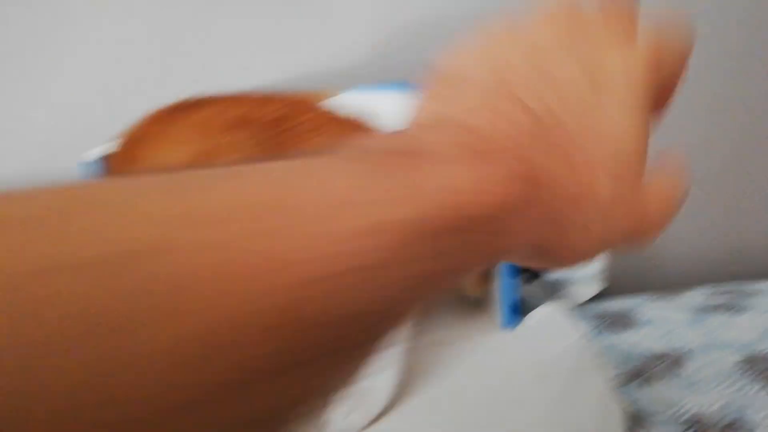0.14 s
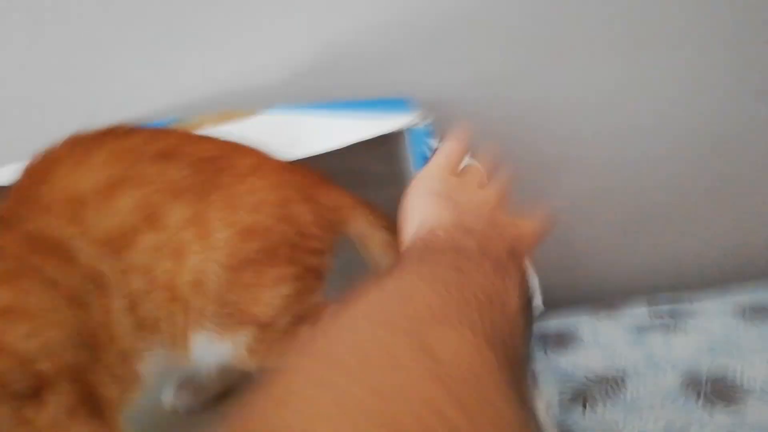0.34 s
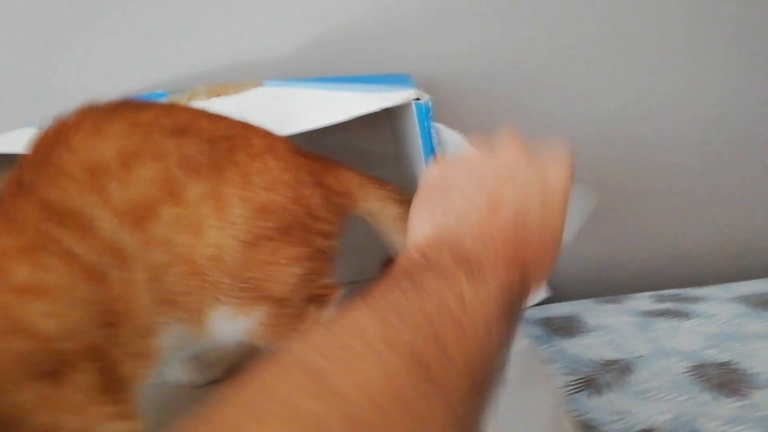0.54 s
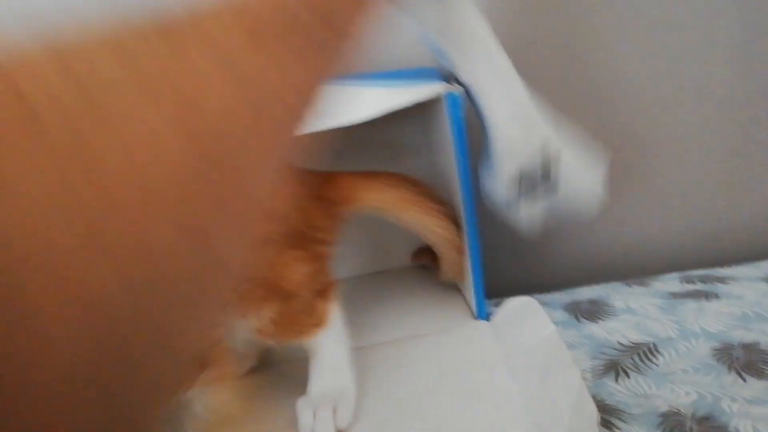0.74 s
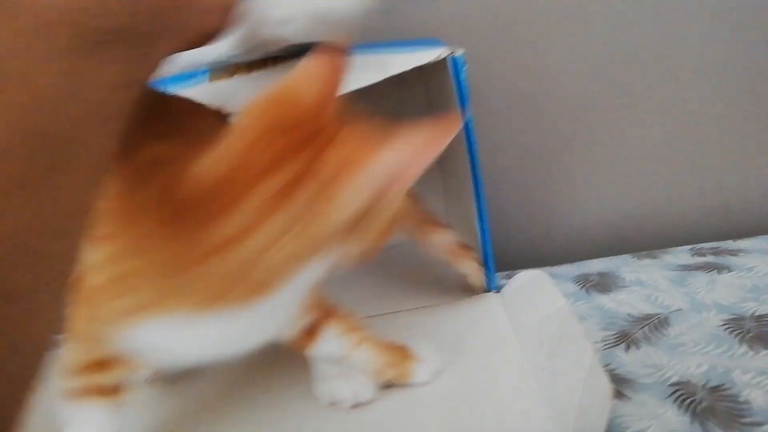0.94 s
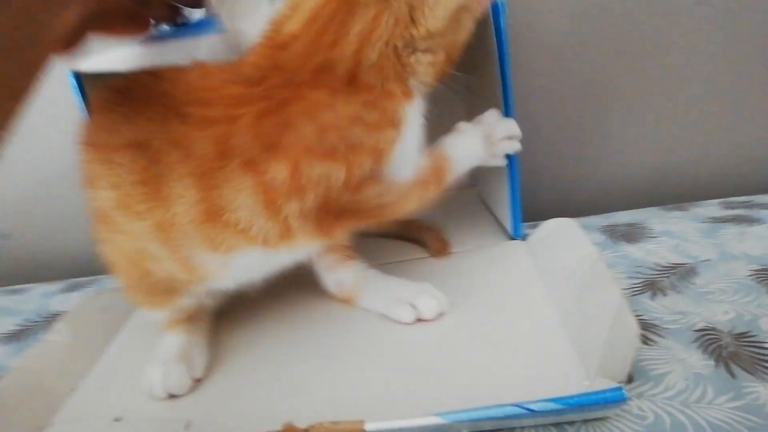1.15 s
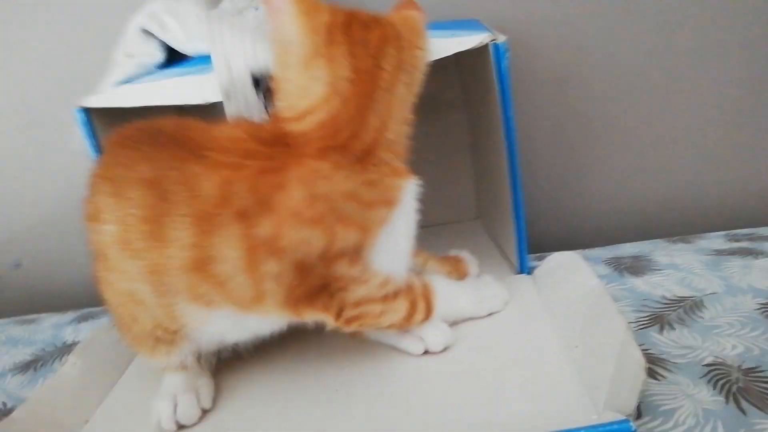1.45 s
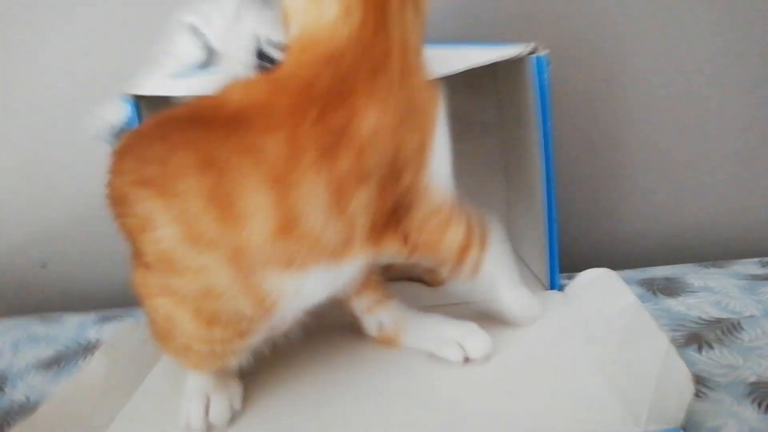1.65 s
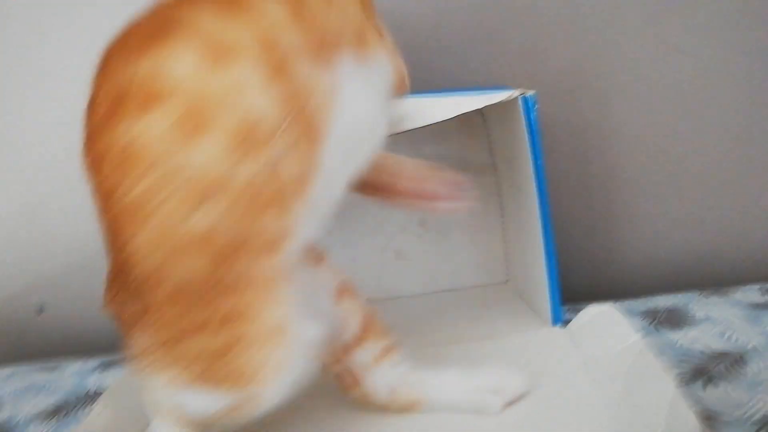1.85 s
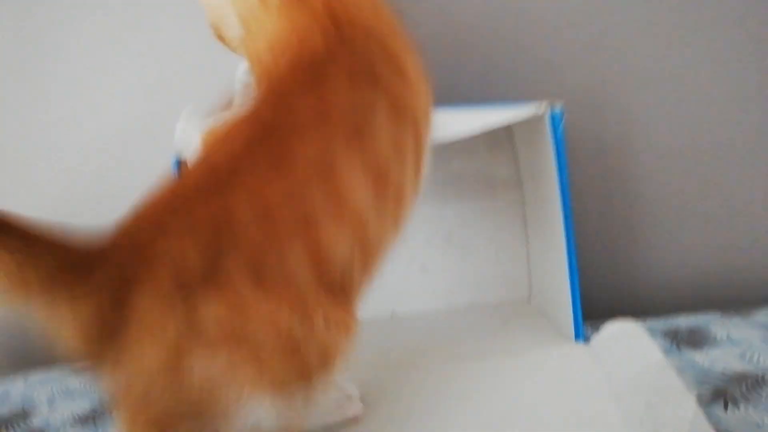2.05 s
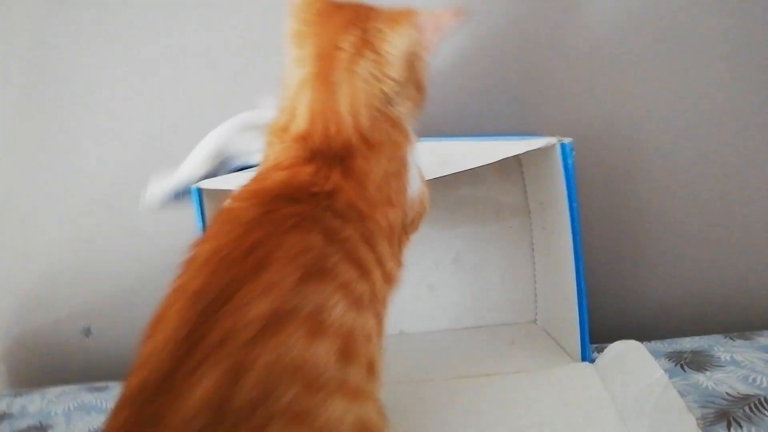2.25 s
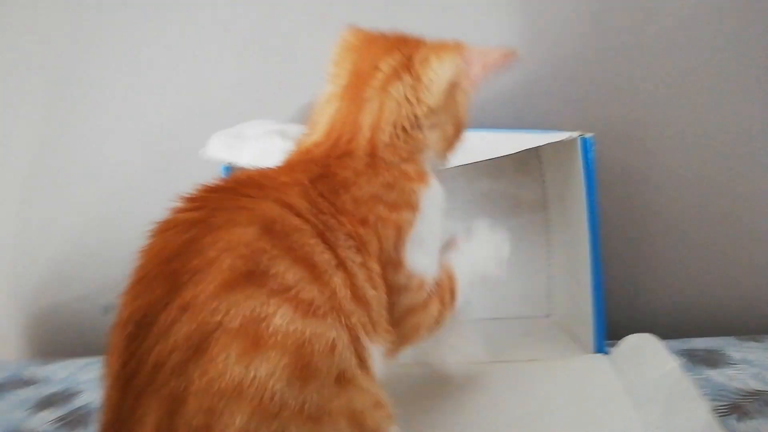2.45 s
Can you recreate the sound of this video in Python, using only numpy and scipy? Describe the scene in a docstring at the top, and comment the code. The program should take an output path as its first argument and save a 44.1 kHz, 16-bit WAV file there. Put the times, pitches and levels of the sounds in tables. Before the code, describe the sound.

Cardboard box knocks, paw thuds and scratchy scuffs as a kitten moves about on a bed

```python
"""On a bed, a kitten scrambles in a cardboard box, close to a hand-held phone with two microphone ports.
Paws thud on the box floor (swinging tones), knock its walls (struck resonances) and drag over the card
(noise that flares at random slips); long slides make a wall sing and claws tick (bright noise bursts).
Fur and cloth rustle and the mattress rumbles under the moving weight, both as grainy noise,
over a faint room hiss. Knocks and ticks leave a short dull room tail."""
import sys
import numpy as np
from scipy import signal
from scipy.fft import rfft, irfft
from scipy.io import wavfile
from scipy.ndimage import uniform_filter1d

SR = 44100
rng = np.random.default_rng(int(sys.argv[2]) if len(sys.argv) > 2 else 0)


def master_out(mix):
    """Clip the mix to full scale and print it as 16-bit PCM to the path in sys.argv[1]."""
    frames = np.transpose(np.atleast_2d(mix))
    ceiling = np.clip(frames, -1, 1)
    pcm = np.round(ceiling * 32767).astype(np.int16)
    wavfile.write(sys.argv[1], SR, pcm)


def to_linear_factor(level_db):
    """Convert decibel levels (scalar or array-like) to linear amplitude factors."""
    exponent = np.asarray(level_db, float) / 20
    return 10 ** exponent


N = 114660  # length in samples, 2.6 s

# Tone colour of paw rubbing on card. Each row: frequency in Hz, relative level in dB.
CARD_COLOUR = [(200, -35), (380, -17), (600, -10), (860, -5), (1400, -2.5), (2600, -9.5), (4200, -7.5),
               (5800, -17), (10400, -16), (16000, -60)]


def evened(x):
    """Scales a sound to an rms of 1."""
    return x / np.sqrt(np.mean(x ** 2) + 1e-20)


def peaked(x):
    """Scales a sound to a peak of 1."""
    return x / np.abs(x).max()


def read(points, hz):
    """Reads a table of (Hz, value) points at any frequency, along a log frequency axis."""
    f, value = np.transpose(points)
    return np.interp(np.log(hz + 1), np.log(f + 1), value)


def curve(table):
    """Draws straight lines between the rows of a timed table, giving each column at every sample."""
    rows = np.transpose(table)
    t = np.arange(N) / SR
    return [np.interp(t, rows[0], column) for column in rows[1:]]


def sides(pan_db):
    """Left and right gains that differ by pan_db; positive is louder on the left."""
    return np.array([to_linear_factor(pan_db / 2), to_linear_factor(-pan_db / 2)])


def place(rows, source):
    """Makes one sound per row with the given source and mixes it in at its start time."""
    mix = np.zeros((2, N))
    for start_s, *settings in rows:
        sound = source(*settings)
        part = mix[:, round(start_s * SR):][:, :sound.shape[-1]]
        part += sound[..., :part.shape[1]]
    return mix


def resonate(x, hz, width_hz):
    """A resonance: shifts hz down to zero, smooths, then shifts back; hz may glide."""
    turn = np.exp(2j * np.pi * np.cumsum(hz * np.ones(x.shape[-1])) / SR)
    r = np.exp(-np.pi * width_hz / SR)
    smooth = signal.lfilter([1 - r], [1, -r], x / turn)
    return 2 * (turn * smooth).real


def resonate_twice(x, hz, width_hz):
    """The same resonance two times over, for steeper slopes."""
    return resonate(resonate(x, hz, width_hz), hz, width_hz)


def alike(pair, same):
    """Blends two independent noises so that the ports are alike by the share same (0 to 1)."""
    return np.array([pair[0], same * pair[0] + np.sqrt(1 - same ** 2) * pair[1]])


def friction(colour, per_s, size_db, grain_s):
    """Rubbing: noise that flares at random slips and dies away, coloured, partly alike at the two ports."""
    # How alike the two ports are. Each row: frequency in Hz, likeness from 0 to 1.
    likeness = [(30, .998), (100, 0.99), (200, 0.88), (380, 0.53), (800, 0.2), (1500, 0.23), (4000, 0),
                (12000, 0)]
    sizes = to_linear_factor(size_db * np.minimum(rng.exponential(1, N), 3.5))
    slips = sizes * (rng.random(N) < per_s / SR)
    flare = signal.lfilter([1], [1, -np.exp(-1 / (grain_s * SR))], slips) + 0.1
    spectrum = rfft(flare * rng.standard_normal((2, N)))
    hz = np.fft.rfftfreq(N, 1 / SR)
    coloured = alike(spectrum, read(likeness, hz)) * to_linear_factor(read(colour, hz))
    return evened(irfft(coloured, N))


def burst(t60, same, rise_s, size=4000):
    """A noise burst for two ports that swells, then dies by 60 dB in t60 seconds."""
    t = np.arange(size) / SR
    envelope = to_linear_factor(-60 * t / t60) * (1 - np.exp(-t / rise_s))
    return alike(rng.standard_normal((2, size)) * envelope, same)


def drag():
    """Paws drag over the card in dense, uneven slips."""
    # How strongly the paws rub. Each row: time in seconds, level in dB.
    rubbing = [(0, -62), (0.12, -64), (0.415, -48), (0.425, -35.5), (0.5, -46.5), (0.58, -54.5),
               (0.66, -46.5), (0.8, -46.5), (0.9, -50), (0.96, -53), (0.98, -44.5), (1.09, -42),
               (1.12, -46.5), (1.16, -68), (1.19, -45), (1.235, -40), (1.26, -36.5), (1.29, -39.5),
               (1.335, -41.5), (1.365, -37), (1.41, -52.5), (1.5, -51.5), (1.66, -53), (1.72, -49),
               (1.87, -40.5), (1.98, -61), (2.06, -55), (2.09, -47.5), (2.35, -48), (2.48, -55),
               (2.54, -46.5)]
    return to_linear_factor(curve(rubbing)[0]) * friction(CARD_COLOUR, per_s=660, size_db=7, grain_s=0.024)


def fur():
    """Fur and cloth rustle in fine bright grains that lean left or right."""
    # How the rustle moves. Each row: time in seconds, level in dB, left minus right in dB.
    rustle = [(0, -57, 6.5), (0.1, -61, 3.5), (0.2, -53, 7), (0.412, -48, 1.5), (0.43, -39.5, 7),
              (0.47, -47.5, 4), (0.62, -58, 2), (0.7, -45, -7), (0.8, -49.5, 4), (0.87, -51.5, 1.5),
              (0.965, -42, 3), (0.975, -33.5, 2), (1.07, -37, 4), (1.11, -47.5, 2), (1.19, -55, 9),
              (1.28, -46.5, 8), (1.32, -45.5, -1), (1.39, -53.5, 5), (1.5, -57.5, 6), (1.66, -53.5, 3),
              (1.8, -46.5, -0.5), (1.95, -39, 1.5), (2.0, -43.5, -2), (2.06, -52, 0), (2.1, -42, -1),
              (2.33, -44.5, -4.5), (2.45, -50.5, -3.5), (2.6, -54.5, 7)]
    # Tone colour of the rustle. Each row: frequency in Hz, relative level in dB.
    colour = [(520, -7), (1200, -3.5), (2500, -8.5), (3690, -8.5), (4580, -5.5), (7650, -6.5), (9080, -2),
              (11600, 1), (14900, -11.5), (16000, -16.5)]
    db, pan_db = curve(rustle)
    return to_linear_factor(db) * sides(pan_db) * friction(colour, per_s=900, size_db=2.5, grain_s=0.0087)


def bed():
    """The mattress gives a lumpy low rumble under the moving weight."""
    # How strongly the mattress rumbles. Each row: time in seconds, level in dB.
    rumble = [(0, -43.5), (0.1, -53.5), (0.3, -52.5), (0.45, -43), (0.55, -46), (0.7, -41.5), (0.88, -48),
              (1.13, -45.5), (1.3, -47), (1.4, -53.5), (1.58, -40.5), (1.65, -33), (1.75, -39.5),
              (1.9, -42), (2.04, -44.5), (2.15, -39), (2.25, -47.5), (2.45, -52.5), (2.6, -44)]
    # Tone colour of the rumble. Each row: frequency in Hz, relative level in dB.
    colour = [(15, -1.5), (30, -6.5), (42, -0.5), (56, -1), (80, -4), (120, -13.5), (175, -12.5),
              (260, -16.5), (400, -21), (520, -27), (1000, -82)]
    return to_linear_factor(curve(rumble)[0]) * friction(colour, per_s=300, size_db=1.5, grain_s=0.015)


def hiss():
    """A faint room hiss: noise with flares so frequent that they blur together."""
    # Tone colour of the hiss. Each row: frequency in Hz, relative level in dB.
    colour = [(100, -21), (289, -24), (6150, -45), (11900, -51), (16000, -49)]
    return to_linear_factor(-68.5) * friction(colour, per_s=5700, size_db=0, grain_s=0.0034)


def thud(db, hz, t60):
    """The box floor bends and swings back unevenly: a wobbling tone and a faster-dying overtone."""
    size = 9000
    t = np.arange(size) / SR
    smoothed = uniform_filter1d(rng.standard_normal(size), size=300)
    shake = evened(uniform_filter1d(smoothed, size=300))
    # The wobble, in radians, grows in over the first two cycles.
    angle = 2 * np.pi * hz * t + shake * np.minimum(hz * t / 2, 1)
    fade = to_linear_factor(-60 * t / t60)
    swing = np.sin(angle) + to_linear_factor(-6) * fade * np.sin(2.015 * angle)
    rise = 1 - np.exp(-t / 0.0011)
    return -to_linear_factor(db - 2.5) * peaked(rise * fade * swing)  # the first swing is downward


def thuds():
    """All paw thuds on the box floor, equal at both ports."""
    # Each row: start in seconds, level in dB before a shared trim, pitch in Hz,
    # time to die by 60 dB in seconds.
    paw_thuds = [(0.183, -36, 65.4, 0.39), (0.426, -30.5, 97.7, 0.26), (0.428, -37, 340, 0.18),
                 (0.511, -32.5, 62, 0.059), (0.593, -24.5, 93, 0.01), (0.618, -33.5, 63, 0.09),
                 (0.938, -36, 167, 0.12), (1.043, -36, 182, 0.098), (1.067, -30, 85.5, 0.14),
                 (1.179, -32, 72, 0.19), (1.292, -21.5, 405, 0.061), (1.297, -29.5, 103.7, 0.3),
                 (1.302, -23, 253, 0.11), (1.322, -18.5, 133, 0.038), (1.543, -29, 154, 0.19),
                 (1.615, -25, 110, 0.071), (1.628, -24, 133, 0.07), (1.64, -33, 243, 0.085),
                 (1.684, -38, 67.3, 0.061), (1.776, -32, 102, 0.12), (1.851, -27, 108.2, 0.27),
                 (1.874, -28.5, 65.6, 0.041), (1.942, -28, 64.4, 0.19), (2.072, -18, 167.4, 0.12),
                 (2.12, -39, 133, 0.1), (2.165, -30.5, 65.2, 0.15)]
    return place(paw_thuds, thud)


def knock(db, hz, snap_db, contact_s):
    """A first snap and a rough contact ring the struck spot and the wall modes nearest it, with a dry crack."""
    # Resonances of the box wall, before each knock detunes them slightly. Each row: frequency in Hz,
    # level in dB before the loss with distance in pitch, time to die by 60 dB in seconds.
    wall_modes = [(630, -2, 0.039), (790, -9, 0.058), (900, -8, 0.083), (1112, -10, 0.094),
                  (1180, -10, 0.039), (1320, -1.5, 0.047), (1480, -8, 0.054), (1740, -11, 0.023),
                  (1860, -8, 0.042), (2140, -9, 0.016), (2800, -6, 0.025), (3270, 1, 0.017),
                  (3770, 9, 0.0067)]
    t = np.arange(4000) / SR
    likeness = 0.45
    spot_turns, snap_turns = 21, 0.21  # the spot's 60 dB decay and the snap's width, in cycles of hz
    ring = to_linear_factor(6.5 - 60 * t * hz / spot_turns) * np.sin(2 * np.pi * hz * t)
    for mode_hz, mode_db, t60 in wall_modes:
        bend = 1 + 0.012 * rng.standard_normal()
        near_db = mode_db - 26 * abs(np.log2(mode_hz / hz))  # 26 dB lost per octave away
        ring = ring + to_linear_factor(near_db - 60 * t / t60) * np.sin(2 * np.pi * mode_hz * bend * t)

    contact = burst(5 * contact_s, likeness, contact_s)
    body = signal.fftconvolve(contact, ring[None], axes=1)[:, :4000]

    dry_noise = burst(0.013 + 2 * contact_s, likeness, contact_s / 2)
    crack = resonate(resonate(dry_noise, hz, 0.94 * hz), 1.4 * hz, 0.89 * hz)

    u = t * hz / snap_turns
    snap = peaked(u * (1 - u / 2) * np.exp(-u)) + peaked(ring)
    struck = peaked(body) + to_linear_factor(-3 + snap_db / 2) * peaked(crack) - to_linear_factor(snap_db) * snap
    return to_linear_factor(db - 2) * struck


def knocks():
    """All knocks on the box walls."""
    # Each row: start in seconds, level in dB before a shared trim, pitch of the struck spot in Hz,
    # first snap in dB, contact time in seconds.
    wall_knocks = [(.327, -33.5, 3230, -1, 0.0016), (.422, -31, 1000, -8, 0.0075),
                   (.593, -36, 990, 3, 0.00025), (.618, -31, 1244, 0, 0.0015),
                   (.971, -27.5, 1560, -27, 0.003), (1.045, -46, 795, -9, 0.002),
                   (1.069, -27, 1410, -23, 0.0015), (1.097, -35, 1360, -12, 0.0013),
                   (1.165, -15.5, 2160, -20, 0.0014), (1.166, -27.5, 1130, -20, 0.0045),
                   (1.171, -15, 1610, -12, 0.0048), (1.175, -13.5, 1210, -35, 0.0014),
                   (1.176, -16, 2120, -9, 0.0013), (1.186, -23, 1220, -26, 0.0024),
                   (1.197, -34, 1460, -22, .004), (1.293, -15, 1630, -1, 0.001),
                   (1.294, -17.5, 4050, 0, 0.0045), (1.302, -26, 1820, 4.5, 0.005),
                   (1.311, -19.5, 3750, -24, 0.0013), (1.544, -34, 900, -10, 0.0012),
                   (1.615, -37, 720, -18, 0.0041), (1.686, -29.5, 1320, -17, 0.0059),
                   (1.7, -19.5, 1236, -24, 0.0026), (1.711, -28.5, 1260, -5, 0.0011),
                   (1.702, -29.5, 624, -21, 0.0076), (1.774, -26, 1220, -6, 0.005),
                   (1.852, -22.5, 1130, -31, 0.0015), (1.861, -24.5, 970, -16, 0.0035),
                   (2.07, -27, 1390, -4.5, 0.0023), (2.16, -24.5, 1320, -15, 0.0021)]
    return place(wall_knocks, knock)


def slides():
    """Long slides make a wall sing: uneven slips ring two gliding wall resonances."""
    # One table per slide. Each row: time in seconds, level of the lower resonance in dB, its pitch in Hz.
    slide_tables = [
        [(.62, -44, 1230), (.7, -47, 1360), (.84, -47.5, 1430), (.9, -55, 1460)],
        [(2.1, -51, 1320), (2.2, -55, 1310), (2.33, -48.5, 1230), (2.42, -61, 1190)],
    ]
    ring_hz, edge_s = 185, 0.015  # width of the lower resonance, fade at each end
    t, out = np.arange(N) / SR, 0
    for table in slide_tables:
        db, hz = curve(table)
        rub = friction(CARD_COLOUR, per_s=1500, size_db=1.5, grain_s=0.0084)
        from_ends = np.minimum(t - table[0][0], table[-1][0] - t)
        inside = np.clip(from_ends / edge_s, 0, 1)
        lower = evened(resonate_twice(rub, hz, ring_hz))
        upper = evened(resonate_twice(rub, 1.56 * hz, 1.56 * ring_hz))
        out = out + inside * to_linear_factor(db) * (lower + to_linear_factor(-10) * upper)
    return out * sides(-1.6)[:, None]


def tick(db, hz, t60, wide_db):
    """A claw catches and lets go: a bright burst, heard through a narrow and a broad resonance."""
    snap = burst(t60, same=0.25, rise_s=0.001)
    narrow = resonate_twice(snap, hz, hz / 6)
    wide = resonate(resonate(snap, 7900, 7900), 8400, 7700)
    return to_linear_factor(db - 3) * (peaked(narrow) + to_linear_factor(wide_db) * peaked(wide))


def ticks():
    """All claw ticks."""
    # Each row: start in seconds, level in dB before a shared trim, centre in Hz,
    # time to die by 60 dB in seconds, level of the broad part in dB against the narrow one.
    claw_ticks = [(.689, -23.5, 8130, 0.0061, -3), (.743, -32, 11700, .017, 3.5),
                  (.758, -21, 12000, 0.029, -16), (.775, -25, 9240, 0.017, 6), (.972, -26, 7800, 0.035, -3),
                  (1.165, -20, 5020, 0.031, 5), (1.172, -21.5, 5870, 0.019, -13),
                  (1.175, -18, 4200, 0.013, 3), (1.293, -22.5, 6040, 0.0053, 9.5),
                  (1.308, -24, 12000, 0.029, -8), (2.072, -24, 12000, 0.072, 3.5),
                  (2.083, -21.5, 11440, 0.034, -4.5)]
    return place(claw_ticks, tick)


def room(x):
    """A short dull tail, different at each port: each sound is smeared by a dying noise burst."""
    tail = resonate(burst(t60=0.14, same=0, rise_s=0.013, size=9000), 0, 8000)  # at 0 Hz: dulls the treble
    tail[:, :130] = 0  # the tail starts 3 ms late
    return signal.fftconvolve(x, tail / np.linalg.norm(tail[0]), axes=1)[:, :N]


def scene():
    """Thuds, then knocks and ticks with their room tail, over the rubbing layers and the hiss."""
    blows = knocks() + ticks()
    rubbing = drag() + fur() + bed() + slides()
    return rubbing + hiss() + thuds() + blows + to_linear_factor(-11) * room(blows)


def band_limit(x):
    """A steep low-pass at the top of the band."""
    return signal.sosfilt(signal.butter(12, 16460, fs=SR, output="sos"), x)


def record(dry):
    """Each port has its own tone colour; both lose the deepest bass and the top of the treble."""
    # How the ports differ. Each row: frequency in Hz, left minus right in dB.
    port_colour = [(60, 0.5), (270, 1.5), (450, -0.5), (1220, -1.5), (2010, -3.5), (3330, 1), (5500, -3),
                   (9080, 4), (12000, -4.5)]
    low_cut_hz, top_hz = 26.5, 15400
    hz = np.fft.rfftfreq(N, 1 / SR)
    bass_cut = hz ** 2 / np.sqrt(hz ** 4 + low_cut_hz ** 4)
    ports = irfft(rfft(dry) * sides(read(port_colour, hz)) * bass_cut, N)
    low_pass = signal.firwin(255, top_hz, window=("kaiser", 9), fs=SR)
    mix = signal.oaconvolve(ports, low_pass[None], "same")
    return band_limit(mix)


dry = scene()
out = record(dry)
master_out(out)
```